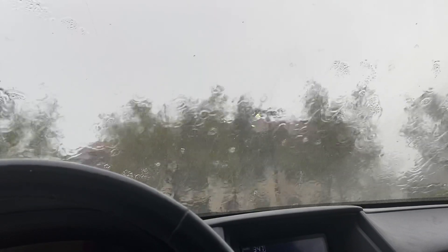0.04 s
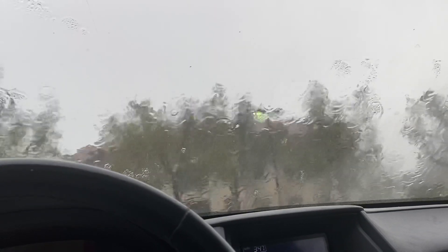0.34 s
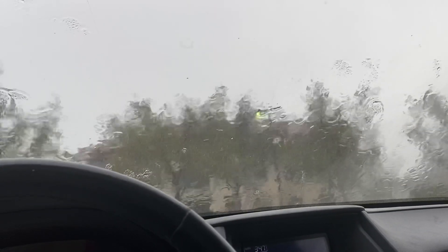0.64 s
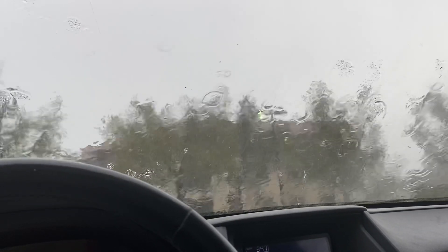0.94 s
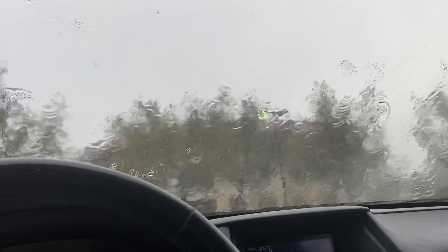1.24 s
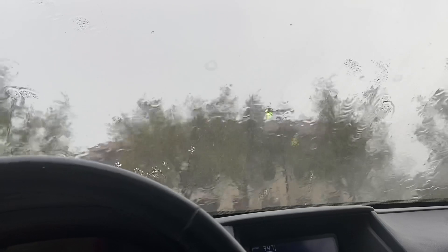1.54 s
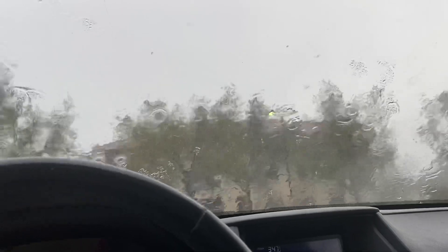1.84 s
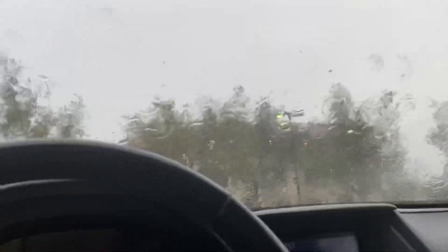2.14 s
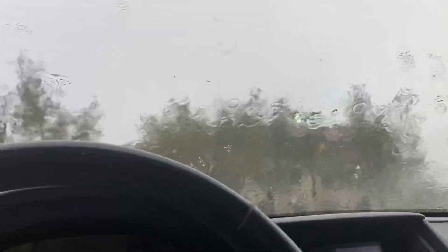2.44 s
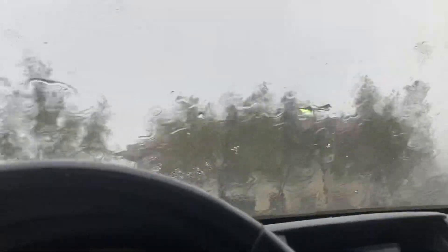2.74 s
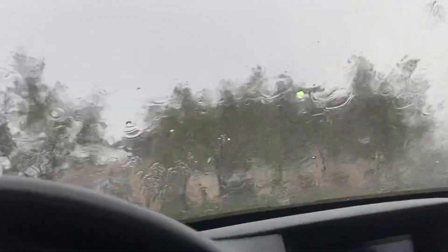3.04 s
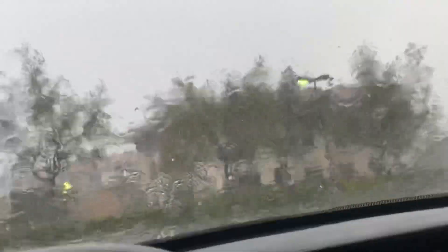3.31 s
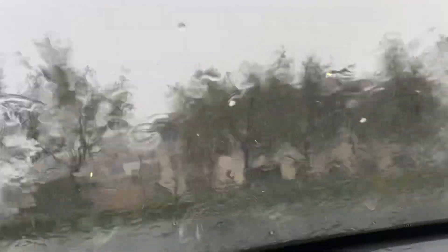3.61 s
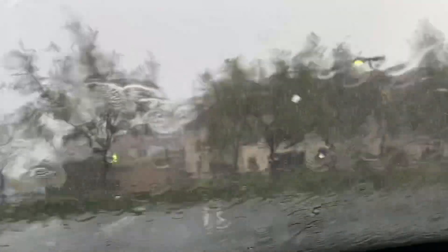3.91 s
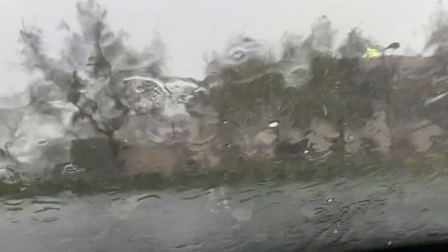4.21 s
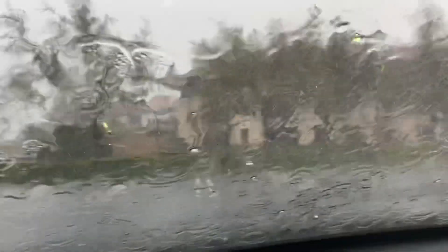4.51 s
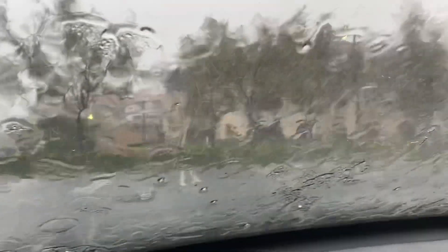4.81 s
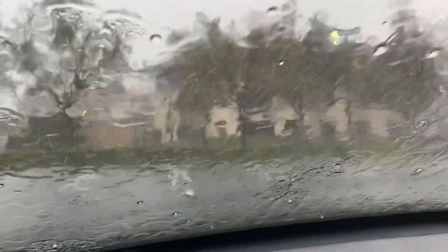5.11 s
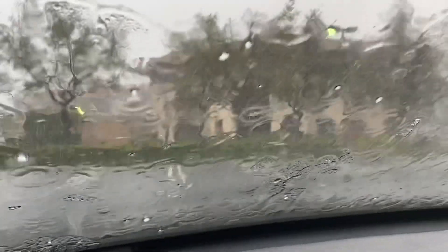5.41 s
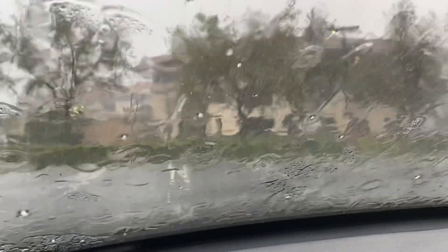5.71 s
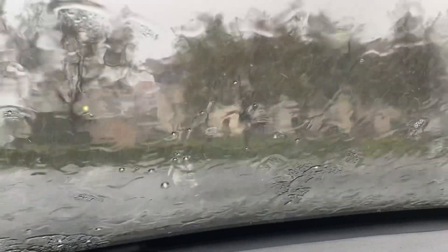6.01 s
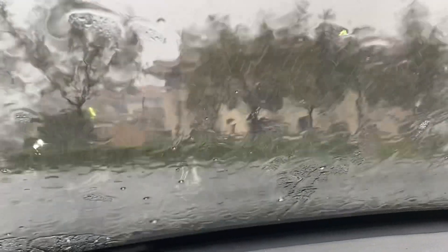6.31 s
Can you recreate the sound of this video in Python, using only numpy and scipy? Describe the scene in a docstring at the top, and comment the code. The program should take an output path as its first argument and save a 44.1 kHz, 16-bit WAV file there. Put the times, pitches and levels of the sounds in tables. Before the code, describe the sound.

Rain is heard close up from inside a parked car, in a small cabin with almost no echo. For the first two seconds it is quiet: a faint, even engine idle hums under scattered drops ticking on the windshield and a few hollow drips on the body panels. From about 2 seconds the shower thickens and a dark wind rumble rises around the car. At about 2.7 seconds there is one soft, dull knock on the trim, followed by four deep, soft thuds of gusts between 2.8 and 3.4 seconds. The rain keeps growing, and from 4 seconds a downpour drums and booms on the padded roof and crackles on the glass, with sharp taps from big drops and fat, hollow plonks. It is loudest near 4.8 seconds and stays heavy until the end, a little after 6 seconds.

```python
"""Rain from inside a parked car, on a two-port microphone in the cabin, close under roof and windscreen.
At first the engine's idle hums under a few drops that tick on the glass and drips that plonk on panels.
From about 2 s the shower builds and wind rumbles around the body; near 3 s comes one soft knock on the
trim, then four gusts thud against the car. From 4 s on, a downpour drums on the padded steel roof and
crackles on the windscreen. Throughout, the small cabin gives the drops a very short tail."""
import sys
import numpy as np
from scipy import signal
from scipy.fft import rfft, irfft, next_fast_len
from scipy.io import wavfile
from scipy.ndimage import uniform_filter1d

SR = 44100
rng = np.random.default_rng(int(sys.argv[2]) if len(sys.argv) > 2 else 0)


def wrap_up_sound(samples):
    """Save the sound to the file named by the first command line argument, as 16-bit audio."""
    columns = np.atleast_2d(samples).T
    # keep every value between -1 and 1, then stretch to whole-number steps
    tamed = np.clip(columns, -1, 1)
    steps = np.round(tamed * 32767).astype(np.int16)
    wavfile.write(sys.argv[1], SR, steps)


N = 280035
TIME = np.arange(N) / SR
TAIL = TIME[:SR // 5]   # the time over which one impact sounds
FFT_SIZE = next_fast_len(N + SR // 2, True)
FFT_HZ = np.maximum(np.arange(FFT_SIZE // 2 + 1) * SR / FFT_SIZE, 1)
CABIN_T60_S, KNOCK_S = 0.1, 0.001   # the cabin's tail; the time for glass or trim to answer a hit

# A struck body panel, heard from inside. Each row: frequency in Hz, level in dB.
PANEL_SPECTRUM = [(120, -22), (230, -7), (290, -1), (350, -2), (420, 0), (510, -0.5), (620, -3.5),
                  (780, -5), (980, -12.5), (1300, -15), (1900, -23.5), (4000, -37.5), (16000, -102)]
# Water splashing on the glass. Each row: frequency in Hz, level in dB.
SPLASH_SPECTRUM = [(3000, -38), (5000, -15), (6200, -1.5), (7500, 2), (10500, -0.5), (12500, -6.5),
                   (16000, -19.5)]


def shower():
    """Heavier rain brings more drops as well as louder ones; each flurry swells and ebbs on top of it."""
    # Rain on the glass, the roof's patter and its boom. Each row: time in seconds, relative level in dB.
    glass_levels = [(0.0, -80), (0.87, -80), (1.08, -75), (1.25, -75.5), (1.7, -77), (2.25, -69.5),
                    (2.72, -69), (2.92, -62.5), (3.04, -62), (3.22, -56.5), (3.43, -57), (3.84, -52),
                    (4.03, -50), (4.5, -49), (4.74, -46), (5.0, -52), (5.25, -51), (5.42, -52),
                    (5.55, -49.5), (5.98, -48), (6.35, -48)]
    patter_levels = [(0.0, -69.5), (0.78, -67.5), (1.61, -66), (1.89, -62), (2.41, -60), (2.83, -57.5),
                     (3.04, -53), (3.38, -48.5), (4.37, -42), (4.56, -42.5), (4.85, -39), (5.04, -43.5),
                     (5.4, -43.5), (6.1, -38.5), (6.35, -39)]
    boom_levels = [(0.0, -68.5), (1.4, -69.5), (2.0, -65), (2.7, -61), (3.1, -55), (3.6, -50), (3.95, -46),
                   (4.4, -45), (4.78, -40), (5.15, -44), (6.35, -40.5)]
    # Flurries flung at the car. Each row: middle and half length in seconds, then the change in dB
    # of the roof's patter and of the glass.
    flurries = [(2.053, 0.061, 1.5, 1), (2.53, 0.031, 3.5, 3), (2.738, .018, -3, 7), (2.874, .05, 5.5, 1),
                (3.101, 0.03, 1.5, 3.5), (3.28, 0.074, 1.5, 2), (3.89, .08, 2.5, 1.5),
                (4.67, 0.039, -1.5, 2), (5.64, 0.091, 2.5, 0), (5.835, 0.022, 3, 0), (6.208, 0.016, 4.5, 1)]
    roof_drops_per_s, glass_drops_per_s = 2550, 590   # at the height of the downpour
    glass_db, patter_db = at_time(glass_levels), at_time(patter_levels)
    for s, half_s, on_roof_db, on_glass_db in flurries:
        swell = np.exp(-((TIME - s) / half_s) ** 2)
        patter_db += on_roof_db * swell
        glass_db += on_glass_db * swell
    density = from_db(0.1 * (glass_db - glass_db.max()))   # the count falls far less than the level
    drumming = roof(roof_drops_per_s * density, at_time(boom_levels), patter_db + 1.17)
    return drumming + windscreen(glass_drops_per_s * density, glass_db)


def roof(per_s, boom_db, patter_db):
    """Overhead, the headliner muffles countless drops: the whole panel booms, smaller fields patter."""
    # The whole roof's low boom. Each row: frequency in Hz, level in dB.
    boom_spectrum = [(60, -39.5), (115, -11.5), (150, 2.5), (175, 2), (200, -2), (240, -8), (400, -38),
                     (3000, -100)]
    boom_hits = rainfall(per_s, spread_db=2.0, burst_s=0.0021, cabin_db=-17.0, spots=12)
    patter_hits = rainfall(per_s, spread_db=3.0, burst_s=0.0033, cabin_db=-5.5, spots=24)
    boom = steady(colour(boom_hits, boom_spectrum), size=5000)
    patter = steady(colour(patter_hits, PANEL_SPECTRUM), size=4000)
    return from_db(boom_db) * boom + from_db(patter_db) * patter


def windscreen(per_s, level_db):
    """Small drops crackle on the bare glass over an even wash of fine spray; some splash brightly."""
    # Rain through the windscreen. Each row: frequency in Hz, level in dB.
    glass_spectrum = [(400, -21), (1000, 2), (1500, 0.5), (2000, 1.5), (2900, 3.5), (4000, 0.5),
                      (5600, -7.5), (7500, -7.5), (10300, -11), (12500, -13.5), (14500, -24), (16000, -46)]
    drops = rainfall(per_s, spread_db=4.5, burst_s=0.0009, cabin_db=-3.5, spots=16, crack=2.4)
    splashes = rainfall(0.14 * per_s, spread_db=6.5, burst_s=0.0012, cabin_db=-13.0, spots=6)
    crackle = from_db(0.65) * steady(colour(drops, glass_spectrum), size=7000)
    sparkle = from_db(-13.5) * steady(colour(splashes, SPLASH_SPECTRUM), size=15000)
    spray = from_db(-5.5) * colour(rng.standard_normal((2, N)), glass_spectrum)
    return from_db(level_db) * (crackle + sparkle + spray)


def big_drops():
    """Each big drop gives a hard tap with a glassy ring, a duller knock of the pane and a bright splash."""
    # Big drops on the windscreen. Each row: start in seconds, relative level in dB, splash offset in dB.
    ticks = [(.0173, -72, 4), (0.0298, -68, -10), (.3044, -69, -4), (.371, -62.5, -3), (.3766, -63, -1),
             (.4935, -70, -4), (0.509, -67, -6), (0.5624, -70, -2), (.6074, -68.5, -2), (0.777, -66, -4.5),
             (.9032, -65, -1), (0.915, -63, 4), (.9339, -74, 2), (.988, -64, 0.5), (1.003, -72, 5),
             (1.0626, -73, 3), (1.0909, -69, -7), (1.1667, -73.5, 6), (1.237, -68, -1), (1.2843, -65, 0),
             (1.32, -67.5, -7), (1.3584, -66, -2), (1.3855, -64.5, -4), (1.4565, -75, -9),
             (1.4818, -66, -20), (1.4969, -72, -10), (1.598, -72.5, 4.5), (1.6402, -77, 1),
             (1.7518, -66, 0), (1.7825, -65.5, -1), (1.85, -63, -8), (1.8683, -70, 1), (1.944, -78, 11),
             (1.9719, -72, 9), (1.9795, -59.5, -1), (2.0002, -62.5, -4), (2.0138, -67, -2),
             (2.0528, -63, 2), (2.083, -62, 2), (2.1444, -63.5, 0), (2.1652, -68, 6), (2.209, -62.5, -1),
             (2.244, -65, -4), (2.33, -59.5, -4), (2.3633, -65, 5), (2.3776, -55, -0.5), (2.4838, -56, -6),
             (2.523, -65, -4), (2.5467, -63, -4), (2.586, -58, 1), (2.6675, -62, -5), (2.763, -50.5, -1.5),
             (2.791, -56, 2), (2.7983, -56, -1), (2.811, -61, 5), (2.867, -52, -0.5), (2.878, -59, 2),
             (2.9311, -64, 6), (2.9906, -54.5, -1.5), (3.0566, -56.5, -1), (3.0695, -54, 1),
             (3.132, -47.5, 3), (3.174, -46, -3), (3.2153, -46, -1.5), (3.2443, -48.5, 1), (3.3, -51, 1),
             (3.337, -47, 0), (3.3441, -49, -4), (3.3546, -48, 0), (3.4592, -50, 0.5), (3.5161, -46.5, -6),
             (3.5512, -48, -5), (3.589, -46.5, -1), (3.605, -47, -4), (3.6673, -52.5, 3), (3.71, -42, -5),
             (3.7185, -43, 0), (3.7531, -51, 2), (3.7965, -53, 5.5), (3.897, -44.5, -1),
             (3.9483, -39.5, -1.5), (4.0136, -42, -2), (4.025, -47, -6), (4.0469, -42.5, -4.5),
             (4.105, -46, -14), (4.113, -43, -11), (4.1287, -46, -6), (4.2025, -44, -12),
             (4.235, -43.5, -5), (4.2624, -41.5, -3.5), (4.2708, -43.5, -1), (4.2929, -41, -5),
             (4.3963, -42, -6), (4.4489, -34.5, -6.5), (4.5457, -39, -8), (4.6433, -44, 3),
             (4.652, -40, 3.5), (4.6598, -39.5, -4), (4.669, -41, -16), (4.7037, -36.5, -1.5),
             (4.77, -40, -7), (4.8256, -34, -5.5), (4.8863, -38, -3), (4.899, -41.5, -3),
             (5.1295, -43.5, 3), (5.157, -46, -11), (5.172, -41.5, -5.5), (5.2285, -47.5, -11),
             (5.3074, -46, -17), (5.3393, -41.5, -5), (5.374, -40.5, -6), (5.4864, -35, -3.5),
             (5.5315, -40, -10), (5.576, -40.5, -8), (5.595, -44, 8), (5.653, -44, -12), (5.746, -40.5, -9),
             (5.7728, -46, -3), (5.802, -42, -15), (5.8139, -39.5, -3), (5.8511, -42.5, -2),
             (5.9713, -38.5, -5.5), (6.023, -39, -4.5), (6.0685, -37, -2), (6.0902, -42, -3),
             (6.1157, -41.5, 5), (6.1644, -42.5, -8), (6.205, -40, -0.5), (6.2536, -49, 6.5),
             (6.283, -39.5, -5)]
    # The hard tap and the pane's knock. Each row: frequency in Hz, level in dB.
    tap_spectrum = [(1500, -33.5), (2600, -7.5), (3300, -1.5), (4400, 1), (5700, -6), (7000, -8.5),
                    (10000, -31), (16000, -48)]
    knock_spectrum = [(300, -25), (1000, -1.5), (1600, -2), (2700, 2), (3500, -1.5), (6000, -25),
                      (16000, -70)]
    tap, knock, splash = np.zeros((3, 2, N))
    for s, db, splash_db in ticks:
        spot_hz = rng.uniform(2300, 5180)   # each spot of the glass has a pitch of its own
        ring = from_db(-8.0) * np.sin(2 * np.pi * spot_hz * TAIL) * dying(t60=0.013)
        add(tap, s, from_db(db - 1.5) * (impact(burst_s=0.00057, cabin_db=-5.5, crack=4) + ring))
        add(knock, s, from_db(db - 6.5) * impact(KNOCK_S, cabin_db=-1.5))
        add(splash, s, from_db(db + splash_db + 2.5) * impact(burst_s=0.00054, cabin_db=-7.0, crack=2.9))
    return colour(tap, tap_spectrum) + colour(knock, knock_spectrum) + colour(splash, SPLASH_SPECTRUM)


def drips():
    """A fat drip lands with a dull thud and bends a panel, which swells into a short hollow note."""
    # Drips on the body. Each row: start in seconds, relative level in dB, pitch in Hz, t60 in seconds.
    plonks = [(0.492, -53, 547, 0.065), (0.563, -46, 557, 0.052), (1.229, -52.5, 533, 0.14),
              (2.057, -45.5, 422.6, 0.092), (2.384, -43.5, 150, 0.051), (2.831, -43, 453, 0.049),
              (3.875, -32.5, 172, 0.075), (4.465, -24, 544, 0.028), (4.714, -27.5, 151, 0.067),
              (4.785, -31, 489, .08), (4.981, -34, 171.2, 0.047), (5.01, -29.5, 156, 0.058),
              (5.355, -28, 169.8, 0.092), (5.722, -32, 149.8, 0.13), (5.869, -24.5, 170.6, 0.098),
              (5.921, -27.5, 454.8, 0.035), (6.197, -24.5, 150, 0.063), (6.22, -27.5, 488, 0.066)]
    notes, thuds = np.zeros((2, N))
    for s, db, hz, t60 in plonks:
        phase = 2 * np.pi * hz * TAIL
        upper_mode = from_db(-5.5) * np.sin(rng.uniform(1.315, 1.69) * phase) * dying(0.5 * t60)
        note = (np.sin(phase) * dying(t60) + upper_mode) * (1 - np.exp(-TAIL * hz / 2.5))
        add(notes, s, from_db(db - 2.0) * note / np.abs(note).max())
        add(thuds, s, from_db(db - 12.5) * impact(burst_s=0.0035, cabin_db=-10.0)[0])
    return notes + colour(thuds, PANEL_SPECTRUM)


def bump():
    """One dull knock on the trim; higher bending waves arrive first, so the pitch drops to a low swing."""
    start_s, level_db, rise_s = 2.712, -39, 0.0012
    start_hz, end_hz, fall_s = 544, 52, 0.0047
    swing, thud = np.zeros((2, N))
    hz = end_hz + (start_hz - end_hz) * np.exp(-TAIL / fall_s)
    tone = np.sin(2 * np.pi * np.cumsum(hz) / SR)
    envelope = dying(t60=0.07) * (1 - np.exp(-TAIL / rise_s))
    add(swing, start_s, from_db(level_db) * tone * envelope / envelope.max())
    add(thud, start_s, from_db(level_db - 8) * impact(KNOCK_S, cabin_db=-20)[0])
    return swing + colour(thud, PANEL_SPECTRUM)


def buffets():
    """A sudden gust pushes on the body, and the cabin air swings for a few cycles."""
    # Deep, soft thuds of wind. Each row: start in seconds, relative level in dB.
    pushes = [(2.781, -36), (2.985, -39), (3.154, -35), (3.344, -33)]
    cabin_hz, rise_s = 70.4, 0.0062
    swing = np.sin(2 * np.pi * cabin_hz * TAIL) * dying(t60=0.13) * (1 - np.exp(-TAIL / rise_s))
    out = np.zeros(N)
    for s, db in pushes:
        add(out, s, from_db(db) * swing)
    return out


def wind():
    """Wind shakes the body all around the microphone as a dark rumble."""
    # The rising wind. Each row: time in seconds, relative level in dB.
    gusts = [(0, -67), (1.9, -63), (2.65, -55.5), (3.1, -49.5), (3.4, -51), (3.8, -51), (4.7, -47),
             (5.4, -45), (6.35, -47)]
    # The body's rumble. Each row: frequency in Hz, level in dB.
    rumble_spectrum = [(12, -28), (33, -16), (42, -2.5), (60, 0.5), (90, -3), (120, -4.5), (170, -21),
                       (400, -57), (3000, -110)]
    rumble = steady(colour(rng.standard_normal((2, N)), rumble_spectrum), size=9000)
    return from_db(at_time(gusts) + 1.0) * rumble


def engine():
    """The idle reaches the cabin as a low, even hum, strongest at the firing rate."""
    # Engine orders. Each row: multiple of the crank rate, rms level in dB.
    orders = [(1, -75), (2, -63), (3, -78), (4, -74)]
    crank_hz = 27.8
    return sum(from_db(db) * np.sqrt(2) * np.sin(2 * np.pi * (order * crank_hz * TIME + rng.random()))
               for order, db in orders)


def outside():
    """Farther off, rain on the ground around the car merges into a dull, steady wash."""
    # The wash through closed doors. Each row: frequency in Hz, level in dB.
    wash_spectrum = [(100, -23), (300, -12.5), (560, 1.5), (780, -2.5), (1100, -16.5), (2000, -23.5),
                     (8000, -66)]
    return from_db(-72) * colour(rng.standard_normal((2, N)), wash_spectrum)


def rainfall(per_s, spread_db, burst_s, cabin_db, spots, crack=0):
    """Drops land at random, many small and few large, on spots that each answer in their own way."""
    at = np.flatnonzero(rng.random(N) < per_s / SR)
    sizes = from_db(spread_db * np.minimum(rng.exponential(1, len(at)), 3.5))
    sizes *= rng.choice([-1, 1], len(at))
    lands_on = rng.integers(0, spots, len(at))
    out = np.zeros((2, N))
    for spot in range(spots):
        clicks = np.zeros((1, N))
        clicks[0, at[lands_on == spot]] = sizes[lands_on == spot]
        answer = impact(burst_s * 2 ** (2 * spot / spots - 1), cabin_db, crack)
        out += signal.oaconvolve(clicks, answer, axes=1)[:, :N]
    return out


def impact(burst_s, cabin_db, crack=0):
    """One drop: a burst as it flattens, with a sharp crack on hard glass, then cabin reflections."""
    age = TAIL / max(burst_s, 1e-4)
    reflections = from_db(cabin_db) * dying(CABIN_T60_S) * (1 - np.exp(-age))
    envelope = age * np.exp(1 - age) + reflections
    burst = rng.standard_normal((2, len(TAIL))) * envelope   # rows: common to both ports, differing
    burst[0, np.argmax(age >= 1)] += crack
    return burst


def colour(x, spectrum):
    """Causal (minimum-phase) filter that keeps the power of white noise."""
    gain = from_db(at_hz(spectrum))
    cepstrum = irfft(np.log(gain / np.sqrt(np.mean(gain ** 2))), FFT_SIZE)
    cepstrum[1:FFT_SIZE // 2] *= 2
    cepstrum[FFT_SIZE // 2 + 1:] = 0
    return irfft(rfft(x, FFT_SIZE) * np.exp(rfft(cepstrum)), FFT_SIZE)[..., :N]


def steady(x, size):
    """Bring the first row's power over size samples to one; single drops stay distinct."""
    return x / np.sqrt(uniform_filter1d(x[0] ** 2, size) + 1e-14)


def from_db(db):
    """Decibels to gain."""
    return 10 ** (np.asarray(db) / 20)


def at_time(points):
    """A table over time, read at every sample."""
    return np.interp(TIME, *np.transpose(points))


def at_hz(points):
    """A table over log frequency, read at every FFT bin."""
    hz, values = np.transpose(points)
    return np.interp(np.log(FFT_HZ), np.log(hz), values)


def dying(t60):
    """An envelope that loses 60 dB in t60 seconds."""
    return np.exp(-np.log(1000) * TAIL / max(t60, 1e-4))


def add(track, s, sound):
    """Mix a sound into a track at time s."""
    start = max(round(s * SR), 0)
    track[..., start:start + sound.shape[-1]] += sound[..., :N - start]


def scene():
    """Rain and wind surround the microphone; drips, bump, buffets and engine sit in the centre."""
    # How alike the ports hear, least in the mids. Each row: frequency in Hz, likeness from 0 to 1.
    likeness = [(60, .99), (170, .985), (300, .95), (520, .88), (1000, .55), (1800, .4), (3000, .75),
                (5000, .85), (8000, .94), (16000, .9)]
    common, differing = rfft(shower() + big_drops() + outside() + wind(), FFT_SIZE)
    alike = np.clip(at_hz(likeness), 0, 1)
    ports = np.sqrt((1 + alike) / 2) * common + np.sqrt((1 - alike) / 2) * differing * [[1], [-1]]
    return irfft(ports, FFT_SIZE)[:, :N] + drips() + bump() + buffets() + engine()


def record(dry):
    """The microphone's two ports differ in colour and in phase; the top is cut at 16 kHz."""
    # Balance of the ports. Each row: frequency in Hz, left minus right in dB.
    port_balance = [(60, -1.5), (150, 1.4), (500, 1), (1200, 4), (2100, 1.5), (3100, 4.5), (4100, 2.5),
                    (5600, 7.5), (7000, 0), (10000, 1), (16000, -1)]
    # Phase between the ports. Each row: frequency in Hz, lead of the left in radians.
    port_phase = [(0, 0), (1550, 0.3), (2150, -0.1), (2930, 1.0), (3700, 0.2), (7410, -0.0), (8440, -2.8),
                  (9560, -3.4), (10400, -5.9), (11600, -6.4), (12500, -9.1), (13800, -9.6), (14600, -12.6),
                  (16200, -12.5)]
    lead = np.interp(FFT_HZ, *np.transpose(port_phase))
    balance = from_db(at_hz(port_balance) / 2)
    response = np.array([balance * np.exp(1j * lead), 1 / balance])
    heard = irfft(rfft(dry, FFT_SIZE) * response, FFT_SIZE)[:, :N]
    return signal.sosfilt(signal.ellip(10, .1, 80, 16000, fs=SR, output="sos"), heard)


dry = scene()
out = record(dry)
wrap_up_sound(out)
```